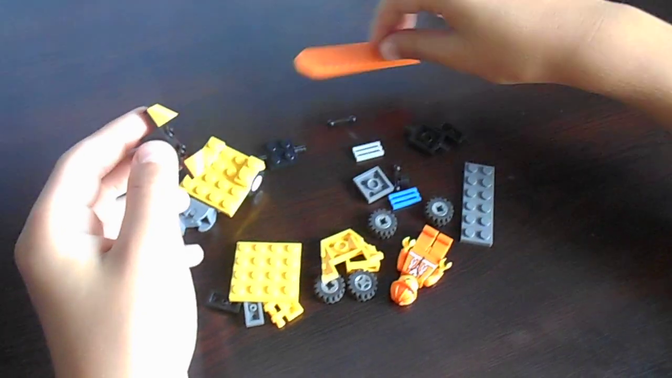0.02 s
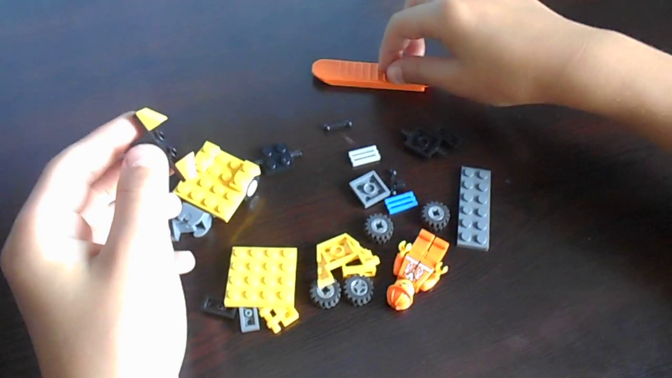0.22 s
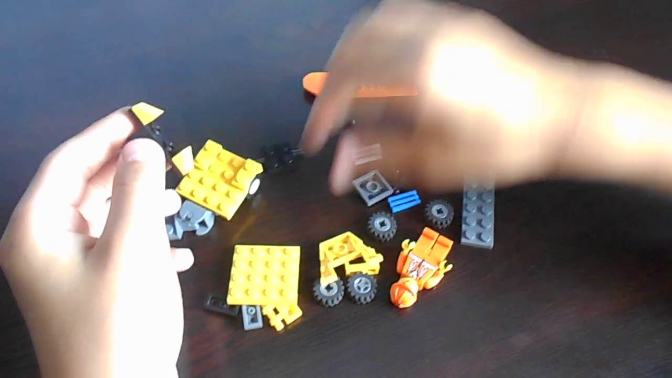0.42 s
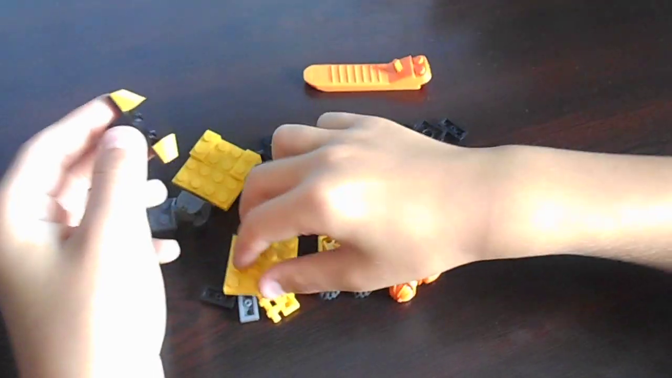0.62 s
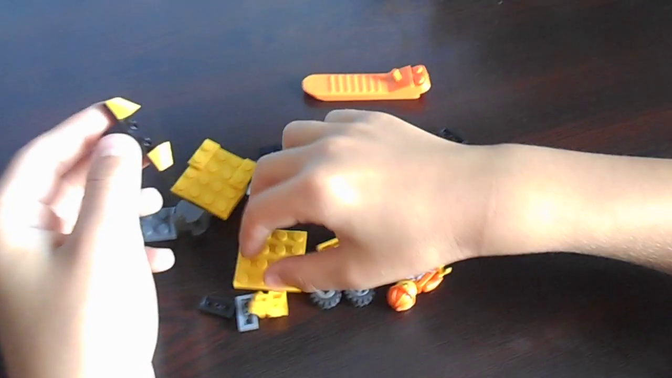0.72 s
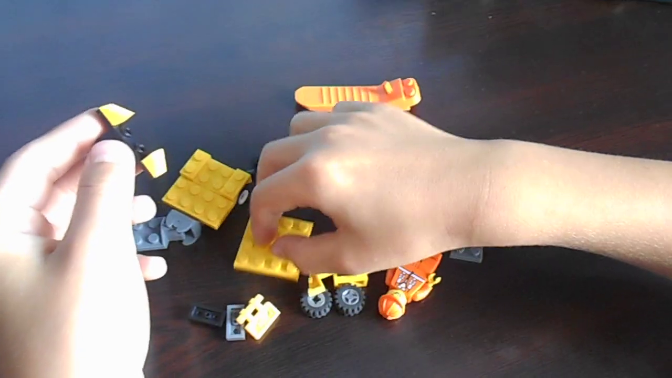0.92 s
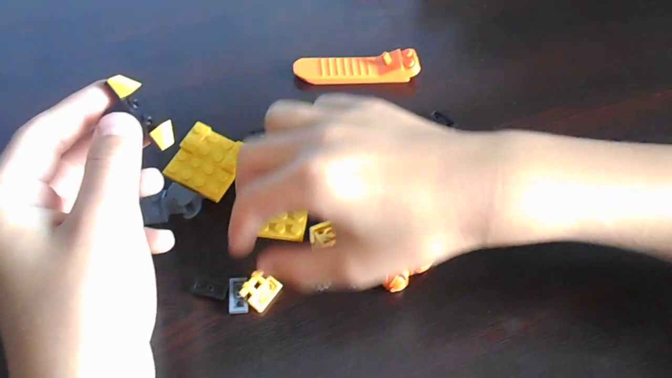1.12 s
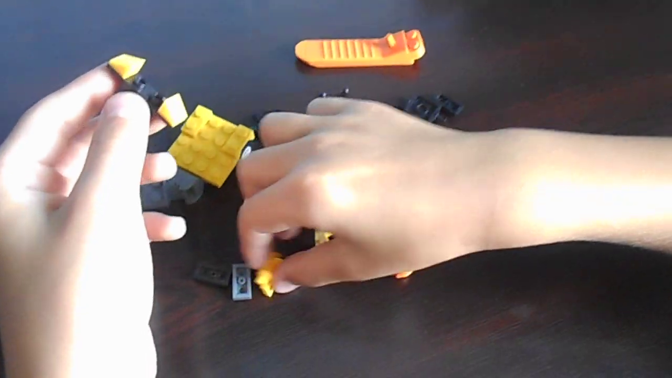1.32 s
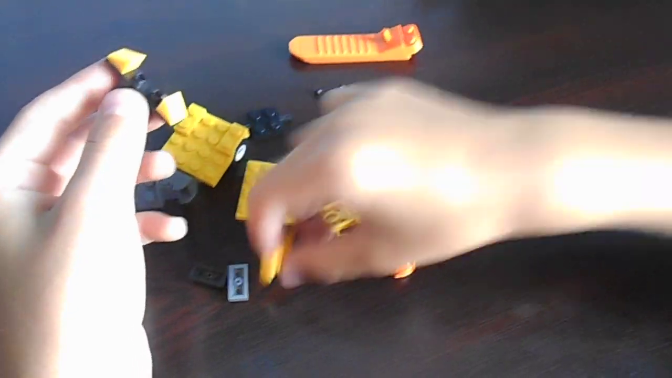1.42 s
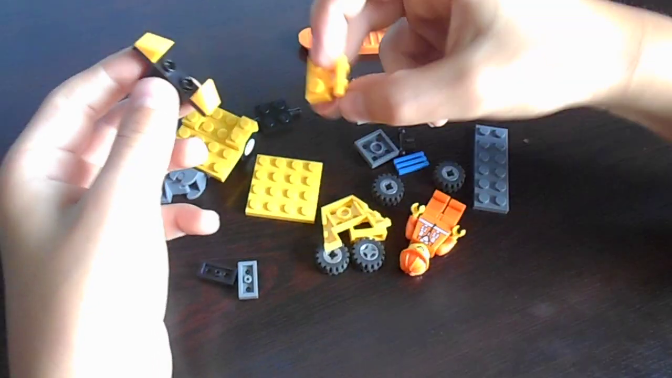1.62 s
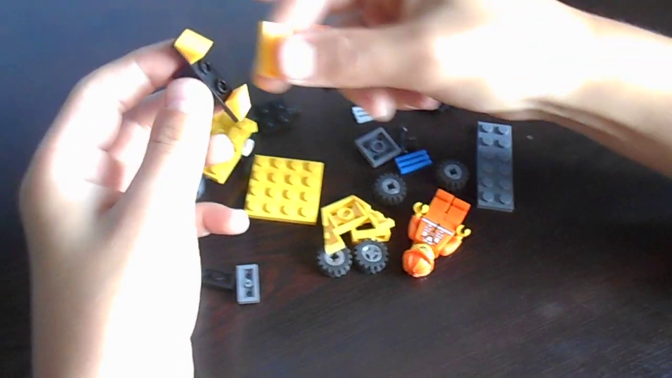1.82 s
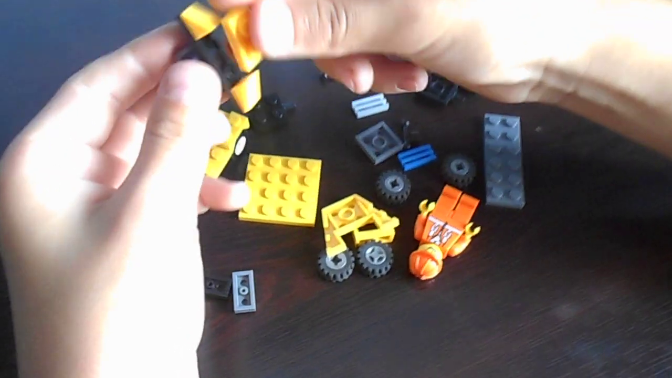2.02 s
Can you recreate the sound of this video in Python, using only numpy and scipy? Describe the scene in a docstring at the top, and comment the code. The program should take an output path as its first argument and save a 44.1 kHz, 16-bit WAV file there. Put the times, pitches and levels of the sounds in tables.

```python
"""Hands slide softly over wood and plastic, above room air and a mains hum in a quiet room.
Then a long flat toy brick drops on a wooden table and bounces, a plate is flicked and rattles to rest,
and small parts tick between the fingers. Contacts are dying noise bursts that ring the modes of a piece;
slides, air and the room tail are filtered noise, sharp snaps are filtered clicks, the hum is a sine."""
import sys
import numpy as np
from scipy import signal
from scipy.fft import rfft, irfft
from scipy.io import wavfile

SR = 44100
rng = np.random.default_rng(int(sys.argv[2]) if len(sys.argv) > 2 else 0)


def wrap_up_sound(samples):
    """Save the sound to the file named by the first command line argument, as 16-bit audio."""
    columns = np.atleast_2d(samples).T
    # keep every value between -1 and 1, then stretch to whole-number steps
    tamed = np.clip(columns, -1, 1)
    steps = np.round(tamed * 32767).astype(np.int16)
    wavfile.write(sys.argv[1], SR, steps)


N = 92610


def from_db(db):
    """Decibels to gain."""
    return 10 ** (np.asarray(db) / 20)


def rms_one(x):
    """Scale to rms 1."""
    return x / np.sqrt(np.mean(x ** 2) + 1e-20)


def at_hz(points, hz):
    """Read a table of (Hz, value) on a log frequency axis."""
    table_hz, values = np.transpose(points)
    return np.interp(np.log(hz), np.log(table_hz), values)


def band(x, low_hz, high_hz):
    """Butterworth band-pass."""
    return signal.sosfilt(signal.butter(2, [low_hz, high_hz], "band", fs=SR, output="sos"), x)


def ring(x, hz, t60_s):
    """Two-pole resonator: a unit click sets a sine of height 1 ringing."""
    radius = from_db(-60 / (max(t60_s, 0.005) * SR))
    w = 2 * np.pi * hz / SR
    return signal.lfilter([0, np.sin(w)], [1, -2 * radius * np.cos(w), radius ** 2], x + 1e-18)


# Room air spectrum. Each row: frequency in Hz, relative density in dB per Hz.
AIR_SPECTRUM = [(20, -16), (40, -1), (62, -10.5), (100, -16), (160, -1.5), (250, -2.5), (400, 3), (630, 0),
                (1300, 1), (3000, -4), (6300, -14), (9000, -18.5), (10300, -34.5)]
AIR_RMS_DB, HUM_RMS_DB, HUM_HZ = -62, -74, 120


def air_and_hum():
    """Steady room air is noise shaped by its spectrum; the mains hum is one sine."""
    hz = np.maximum(np.arange(N // 2 + 1) * SR / N, 1)
    noise = irfft(rfft(rng.standard_normal(N)) * from_db(at_hz(AIR_SPECTRUM, hz)), N)
    hum = np.sqrt(2) * np.sin(2 * np.pi * HUM_HZ * np.arange(N) / SR)
    return from_db(AIR_RMS_DB) * rms_one(noise) + from_db(HUM_RMS_DB) * hum


# Skin sliding on wood and plastic. Each row: time in seconds, hiss level in dB, rub level in dB.
SLIDE_LEVELS = [(0, -72, -80.5), (0.081, -60.5, -61.5), (0.162, -78, -72), (.67, -96, -103),
                (.688, -52.5, -57), (0.719, -63, -51.5), (.75, -63, -65), (0.782, -64, -56.5),
                (.815, -50.5, -51.5), (.86, -58, -55), (.925, -58, -54), (0.961, -74, -61),
                (1.03, -67, -55), (1.08, -71.5, -65.5), (1.15, -64.5, -63.5), (1.251, -100, -75),
                (1.391, -63, -61), (1.481, -82, -68.5), (1.7, -68.5, -69), (1.745, -56, -64.5),
                (1.77, -68, -65), (1.85, -71.5, -65.5), (2.1, -94, -69.5)]
GRAINS_PER_S = 2100
HISS_HZ, RUB_HZ = (2410, 7710), (815, 1836)


def hands():
    """Skin sliding: noise with scattered louder grains, as a bright hiss and a duller rub."""
    knot_s, hiss_db, rub_db = np.transpose(SLIDE_LEVELS)
    t = np.arange(N) / SR
    is_grain = rng.random((2, N)) < GRAINS_PER_S / SR
    grains = rng.standard_normal((2, N)) * (2.1 + is_grain)
    hiss = from_db(np.interp(t, knot_s, hiss_db)) * rms_one(band(grains[0], *HISS_HZ))
    rub = from_db(np.interp(t, knot_s, rub_db)) * rms_one(band(grains[1], *RUB_HZ))
    return hiss + rub


# Room decay. Each row: frequency in Hz, T60 in seconds.
ROOM_T60_S = [(300, 0.36), (1500, 0.27), (4300, 0.21), (9000, 0.13)]
ROOM_DB, ROOM_RISE_S = -18, 0.013


def room(x):
    """Diffuse tail: noise that dies at its own rate in each half-octave band."""
    t = np.arange(SR // 2) / SR
    edges_hz = 300 * 2 ** np.arange(0, 5.6, 0.5)
    white = rng.standard_normal((2, len(t)))
    tail = np.zeros(len(t))
    for k, (low_hz, high_hz) in enumerate(zip(edges_hz, edges_hz[1:])):
        t60_s = at_hz(ROOM_T60_S, np.sqrt(low_hz * high_hz))
        tail += band(white[k % 2], low_hz, high_hz) * from_db(-60 * t / t60_s)
    tail *= 1 - np.exp(-t / ROOM_RISE_S)
    tail /= np.sqrt(np.sum(tail ** 2))
    return from_db(ROOM_DB) * signal.fftconvolve(x, tail)[:N]


# Knocks on the wooden top. Each row: start in seconds, level in dB, extra level of the lowest mode in dB.
TABLE_KNOCKS = [(0.212, -48.5, -8.5), (.234, -47, -9.5), (.337, -53, -3.5), (.351, -54.5, 2)]
# Modes of the wooden top. Each entry: pitch in Hz.
TABLE_HZ = [215, 340, 510]
# The same modes. Each row: level in dB, T60 in seconds.
TABLE_MODES = [(-9, 0.47), (-10.5, 0.08), (2, 0.16)]


def table_top():
    """The wooden top rings at a few low modes after the heavier knocks."""
    start_s, knock_db, low_db = np.transpose(TABLE_KNOCKS)
    out = np.zeros(N)
    for k, (hz, (mode_db, t60_s)) in enumerate(zip(TABLE_HZ, TABLE_MODES)):
        extra_db = low_db if k == 0 else 0
        clicks = np.zeros(N)
        clicks[(start_s * SR).astype(int)] = from_db(knock_db + mode_db + extra_db)
        out += band(ring(clicks, hz, t60_s), hz / 2, hz * 2)
    return out


# Contact bands. Each entry: band edge in Hz.
BAND_EDGES_HZ = [850, 1500, 3000, 6000, 8100, 9800]
RISE_S, PUSH_GRIT = 0.00067, 0.15
SNAP = 1.9  # height of the first sharp touch, relative to the chatter
THUD_HZ, THUD_DB, BASS_CUT_HZ = (200, 800), 13.5, 780


def chatter(t, t60_s):
    """Gritty contact: noise under a fast rise and a decay, with the energy of its envelope."""
    envelope = (1 - np.exp(-t / RISE_S)) * from_db(-60 * t / max(t60_s, 0.005))
    grit = rng.standard_normal(len(t)) * envelope
    return grit * np.sqrt(np.sum(envelope ** 2) / np.sum(grit ** 2))


def struck(hits, pitches_hz, modes):
    """Each contact is a brief dying chatter: a snap, a crack and a thud that ring the piece's modes."""
    t = np.arange(SR // 10) / SR
    edges = BAND_EDGES_HZ
    # one row per colour: five bands, then the thud
    cracks, pushes = np.zeros((2, len(edges), N + len(t)))
    for start_s, level_db, *colour_db, t60_s, ring_db in hits:
        burst = chatter(t, t60_s)
        i = int(start_s * SR)
        gains = from_db(level_db + np.array(colour_db))[:, None]
        cracks[:, i:i + len(t)] += gains * (burst + SNAP * (np.arange(len(t)) == 0))
        # modes are pushed by a click 10 samples in, plus a little grit
        push = PUSH_GRIT * burst / np.sqrt(np.sum(burst ** 2)) + (np.arange(len(t)) == 10)
        pushes[:, i:i + len(t)] += from_db(ring_db) * gains * push

    out = np.zeros(N + len(t))
    for crack, low_hz, high_hz in zip(cracks, edges, edges[1:]):
        out += band(crack, low_hz, high_hz) * np.sqrt(SR / 8 / (high_hz - low_hz))
    for k, (hz, (mode_db, t60_s)) in enumerate(zip(pitches_hz, modes)):
        push = pushes[np.searchsorted(edges, hz) - 1]  # modes under the bands follow the thud
        out += (-1) ** k * from_db(mode_db) * ring(push, hz, t60_s)
    # high-pass keeps the pushed modes from leaking bass; the thud is added after the cut
    out = signal.sosfilt(signal.butter(4, BASS_CUT_HZ, "high", fs=SR, output="sos"), out)
    out += from_db(THUD_DB) * band(cracks[-1], *THUD_HZ)
    return out[:N]


# Small parts between the fingers. Each row: start in seconds, level in dB, colour of the five bands
# in dB (five columns), table thud in dB, chatter T60 in seconds, ring in dB.
SMALL_HITS = [(0.504, -58, 4, -14, 5, -26, -40.5, -15, 0.03, -15),
              (1.313, -30.5, -13.5, -37, -4.5, -27, -42, -33, 0.022, -18),
              (1.322, -45.5, -22, 4, 5.5, -27.5, -31.5, -27.5, 0.07, -2),
              (1.511, -42, -7.5, -19, -10, -6.5, -16.5, -25.5, 0.015, -9),
              (1.634, -48, -10, -6, -14, -27, -30, -4.5, 0.04, -8),
              (1.681, -41, -4.5, -14, -4, -12, -31, -22, 0.05, -34),
              (1.752, -37, -9, -1.5, -3, -11, -22, -36, 0.015, -19),
              (1.785, -46, -9.5, -30, -5, -12, -17, -31, 0.095, -20),
              (1.818, -43.5, -10, 1.5, 3, -2.5, -29, -36, 0.033, -33),
              (1.968, -34.5, -7, -41, -6, -16, -32, -16, 0.063, -1.5)]
# Modes of the small parts. Each entry: pitch in Hz.
SMALL_HZ = [860, 2140, 3100, 4350, 4850, 7500]
# The same modes. Each row: level in dB, T60 in seconds.
SMALL_MODES = [(-2, 0.04), (5, 0.02), (-0.5, 0.015), (-3.5, 0.015), (-12, 0.015), (-11, .015)]


def small_parts():
    """Light contacts ring a few short modes."""
    return struck(SMALL_HITS, SMALL_HZ, SMALL_MODES)


# Treble snaps of the plate's contacts. Each row: start in seconds, level in dB.
PLATE_SNAPS = [(.6924, -25), (.843, -30), (.8651, -38), (.8801, -34), (.889, -38), (.8962, -35),
               (.9061, -35), (.9115, -39)]
SNAP_HZ = (4000, 9600)


def plate_snaps():
    """Bright band-passed clicks: the sharp snap of the flick, then of the rattling plate."""
    start_s, level_db = np.transpose(PLATE_SNAPS)
    clicks = np.zeros(N)
    clicks[(start_s * SR).astype(int)] = from_db(level_db) * SR / 2 / (SNAP_HZ[1] - SNAP_HZ[0])
    return band(clicks, *SNAP_HZ)


# Plate flicked, sliding and rattling. Each row: start in seconds, level in dB, colour of the five bands
# in dB (five columns), table thud in dB, chatter T60 in seconds, ring in dB.
PLATE_HITS = [(.6922, -26, -37.5, -6.5, 0.5, 1.5, -37, -35, 0.055, -3),
              (.7045, -38.5, 3, 5.5, -24, -28, -24, -53, 0.055, -22),
              (.714, -42, -15, -20, 12.5, -28, -30, -29, 0.015, -17),
              (.7325, -54, -13, 9, -4, -20, -18, -12.5, 0.076, -1),
              (.765, -58, -24, -26, 0, -20, -36, -34, 0.1, 9),
              (.7731, -52.5, -26, -30, 13, -8, -21.5, -30, 0.051, -13),
              (.7865, -44, -29, -17, 20, -6, -20, -40, 0.0083, -41),
              (.789, -23, -7, 1.5, -6, -11, -14.5, -58, 0.028, -4.5),
              (.843, -37, -12, 7, 13, 9.5, -9, -53, 0.014, -35),
              (.8654, -50, -19, 12, 14, 0, -11, -40, 0.035, -28),
              (.8799, -49, -15, 16, 10, 4, -19, -50, 0.026, -16),
              (.889, -43, -16, -10, 10, -3, -12, -41, 0.02, -26),
              (.8962, -52, -12, 3, 15, 2, -17, -40, 0.017, -26),
              (.906, -51, 5, -4, 10, -9, -15, -37, 0.031, -6.5)]
# Modes of the plate. Each entry: pitch in Hz.
PLATE_HZ = [780, 1010, 1280, 2300, 2590, 3550, 4000, 4390, 4900, 7250, 8830]
# The same modes. Each row: level in dB, T60 in seconds.
PLATE_MODES = [(19, 0.13), (-20, 0.075), (10.5, 0.028), (-5.5, 0.043), (2, 0.014), (-6.5, 0.061),
               (-5, 0.038), (-5, 0.031), (-3, 0.06), (8, 0.0081), (15, 0.027)]


def plate():
    """The flicked plate's contacts, and a faint whistle as it slides, ring its modes."""
    return struck(PLATE_HITS, PLATE_HZ, PLATE_MODES)


# Loose part knocked by the long piece. Each row: start in seconds, level in dB, colour of the five bands
# in dB (five columns), table thud in dB, chatter T60 in seconds, ring in dB.
LOOSE_HITS = [(.3497, -34, -6, 12, 0.002, 9, -23, -10.5, 0.032, 0.011),
              (.3515, -27, -5, -43.5, 0.025, -9, -15, -41, 0.039, 0.0093)]
# Modes of the loose part. Each entry: pitch in Hz.
LOOSE_HZ = [1650, 1745, 1820, 2190, 2980, 4167, 4231, 4274, 4315, 4400, 7300, 8520]
# The same modes. Each row: level in dB, T60 in seconds.
LOOSE_MODES = [(-9.5, 0.043), (-15.5, 0.15), (-9, 0.099), (2, 0.014), (-26, 0.096), (-5, .2), (-13, 0.28),
               (-16, 0.36), (13.5, 0.024), (-18, .08), (-1, 0.026), (-18.5, .15)]


def loose_part():
    """One soft-edged knock, built from two close bursts, rings a loose part."""
    return struck(LOOSE_HITS, LOOSE_HZ, LOOSE_MODES)


# Long piece dropping and bouncing. Each row: start in seconds, level in dB, colour of the five bands
# in dB (five columns), table thud in dB, chatter T60 in seconds, ring in dB.
LONG_HITS = [(0.21, -15, -17, -14, 6, 2, -14.5, -50, 0.028, -7),
             (0.2165, -9, -22.5, -12.5, -22.5, -2, -29.5, -23, 0.014, -15),
             (0.2318, -29, -14, 12, -23, -32.5, -47, -38, 0.013, -6.5),
             (0.2332, -7, -18, -3, 0, -7.5, -26.5, -25.5, 0.027, -3.5),
             (0.2385, -14.5, -39, 3, 2.5, -22, -43.5, -26.5, 0.02, -3.5),
             (0.322, -42.5, -30, -26, 12, -5, -29, -37, 0.054, -26),
             (0.327, -44, 11, 14.5, -22.5, 9, -21, -47, 0.022, -26),
             (0.336, -7, -19, -6.5, -11, -22, -18, -56.5, 0.031, -8.5)]
# Modes of the long piece. Each entry: pitch in Hz.
LONG_HZ = [900, 1150, 1850, 1950, 2230, 2970, 3880, 4520, 7600, 8520]
# The same modes. Each row: level in dB, T60 in seconds.
LONG_MODES = [(-3, 0.05), (3, 0.058), (-5, 0.034), (-6, 0.017), (-9.5, 0.04), (-11.5, 0.058), (0.5, 0.0067),
              (-1, 0.017), (2.5, 0.02), (9.5, 0.029)]


def long_piece():
    """The drop and the bounces ring the short modes of a long flat piece."""
    return struck(LONG_HITS, LONG_HZ, LONG_MODES)


def scene():
    """Bricks and table in the room, over hands, air and hum."""
    background = air_and_hum() + hands()
    bricks = table_top() + small_parts() + plate_snaps() + plate() + loose_part() + long_piece()
    return (background + bricks + room(bricks))[None]


MIC_EDGE_HZ, MIC_SOFT_HZ, CUTOFF_HZ = 11000, 8330, 12400
MIC_BUMP_HZ, MIC_BUMP_DB = (11600, 12300), -19.5


def record(dry):
    """The microphone drops steeply in the treble, with one weak bump above; the top is cut."""
    dull = signal.sosfilt(signal.cheby2(14, 55, MIC_EDGE_HZ, fs=SR, output="sos"), dry)
    dull = signal.sosfilt(signal.butter(2, MIC_SOFT_HZ, fs=SR, output="sos"), dull)
    bump = band(band(dry, *MIC_BUMP_HZ), *MIC_BUMP_HZ)
    heard = dull + from_db(MIC_BUMP_DB) * bump
    return signal.sosfilt(signal.ellip(10, 0.5, 70, CUTOFF_HZ, fs=SR, output="sos"), heard)


dry = scene()
out = record(dry)
wrap_up_sound(out)
```